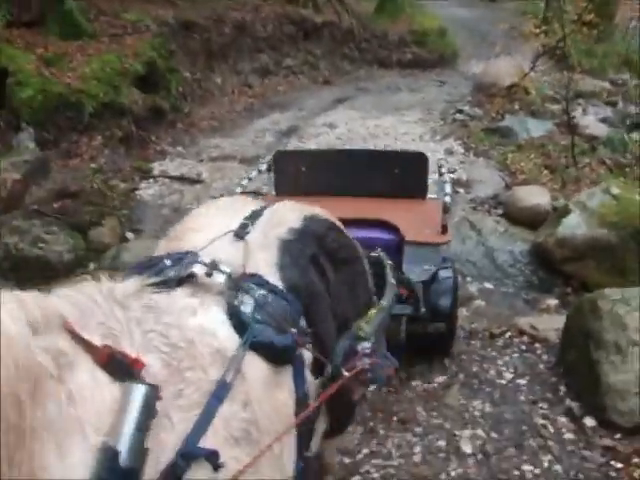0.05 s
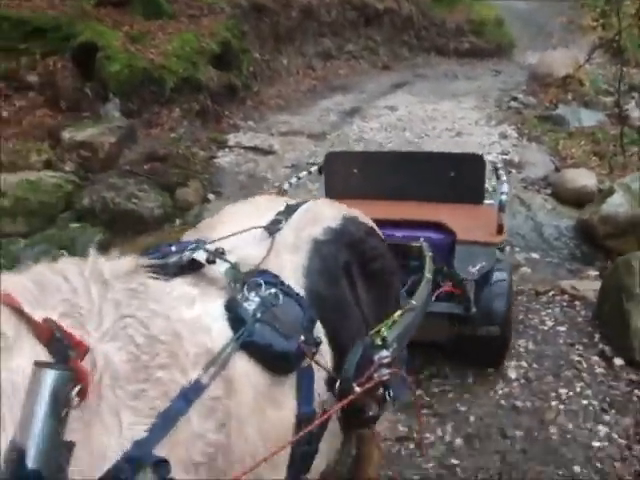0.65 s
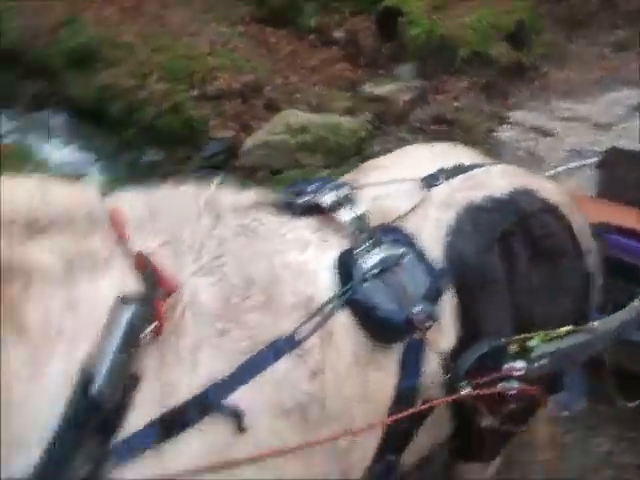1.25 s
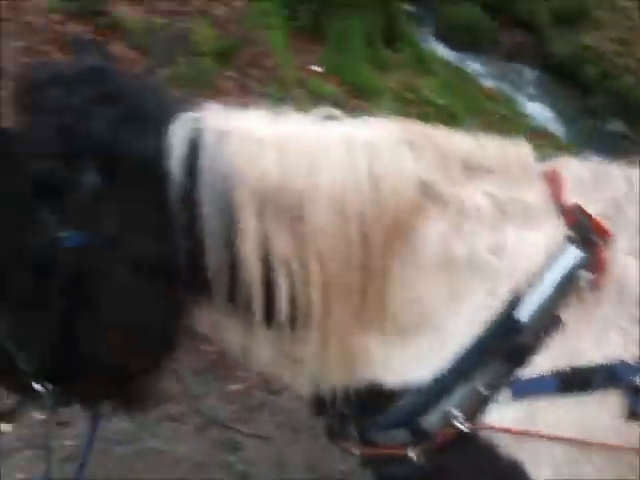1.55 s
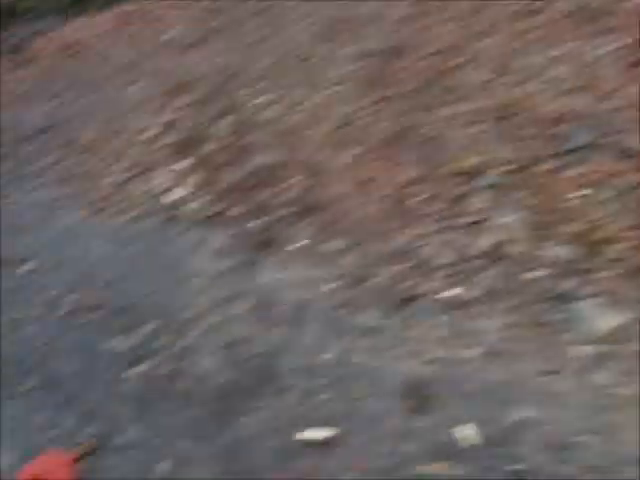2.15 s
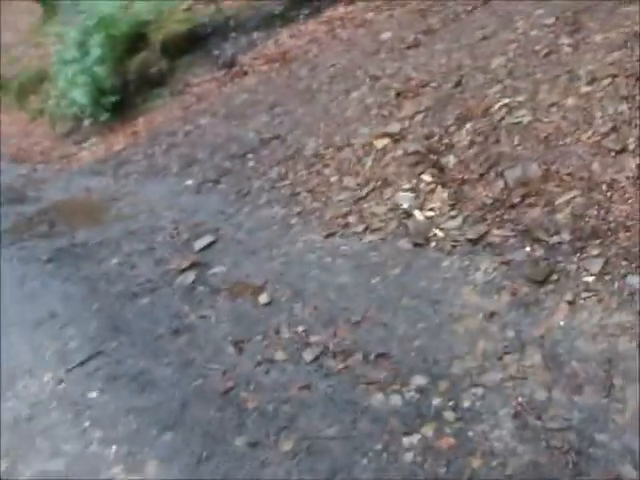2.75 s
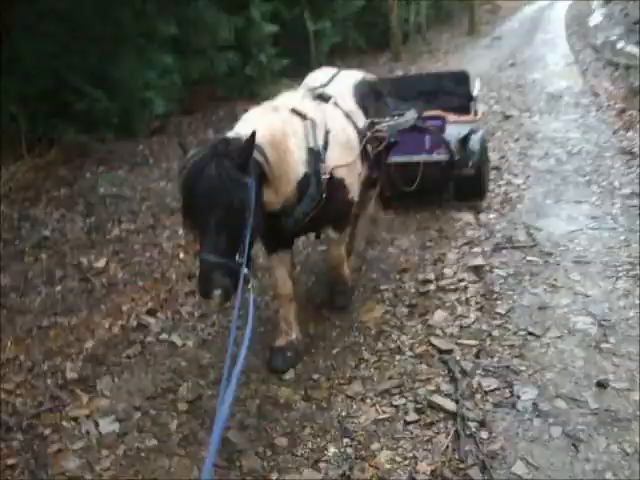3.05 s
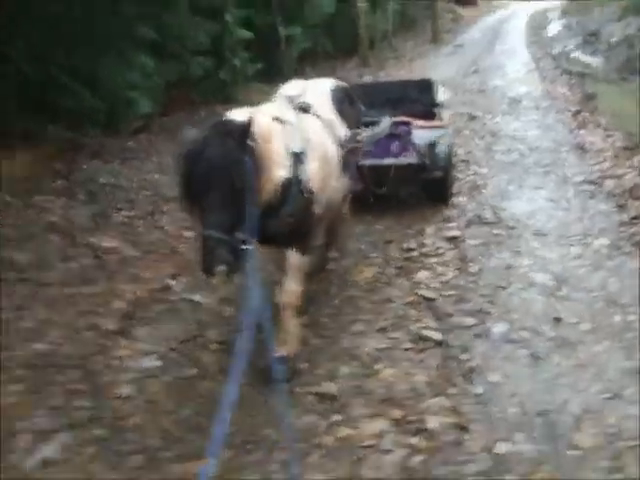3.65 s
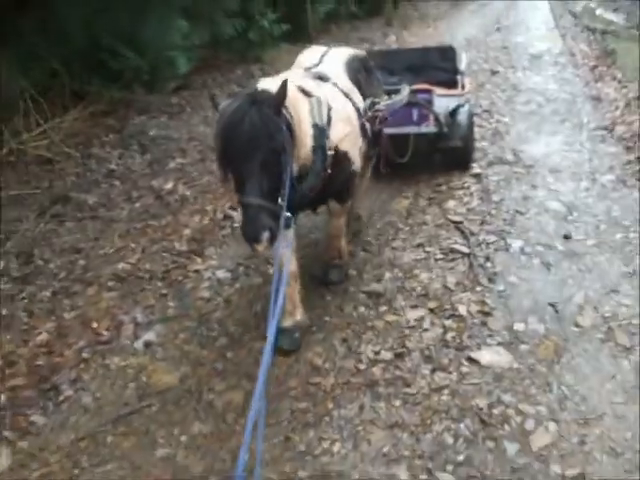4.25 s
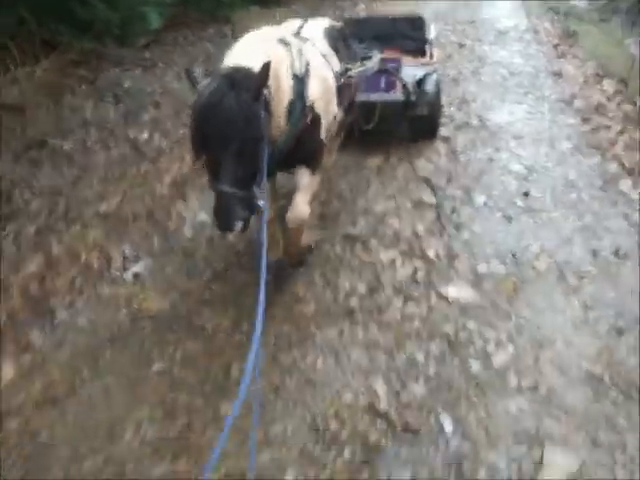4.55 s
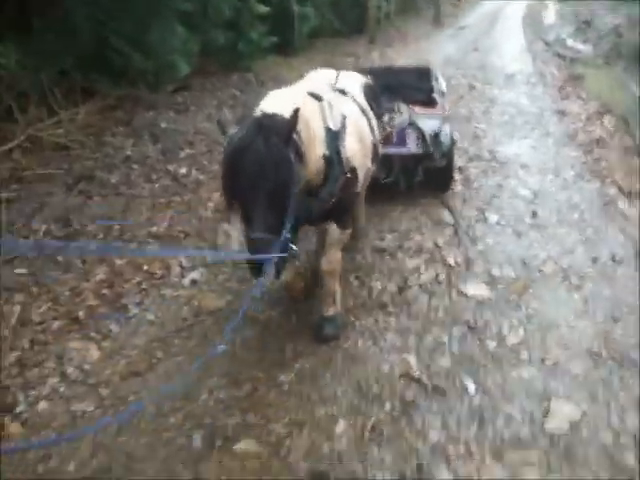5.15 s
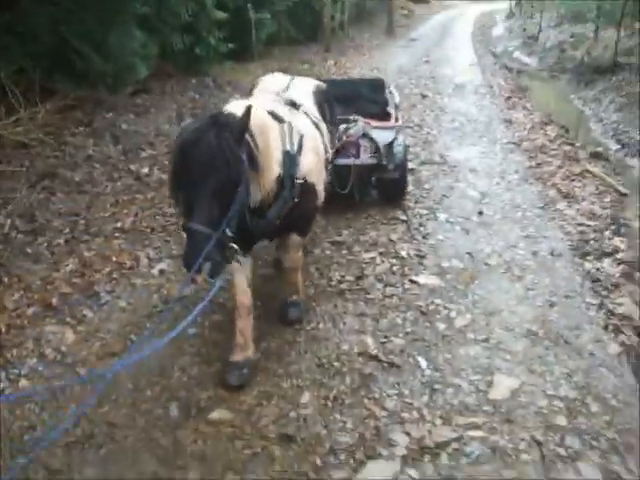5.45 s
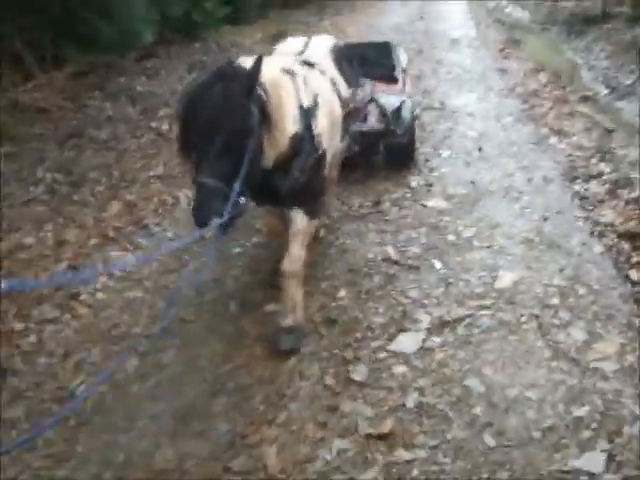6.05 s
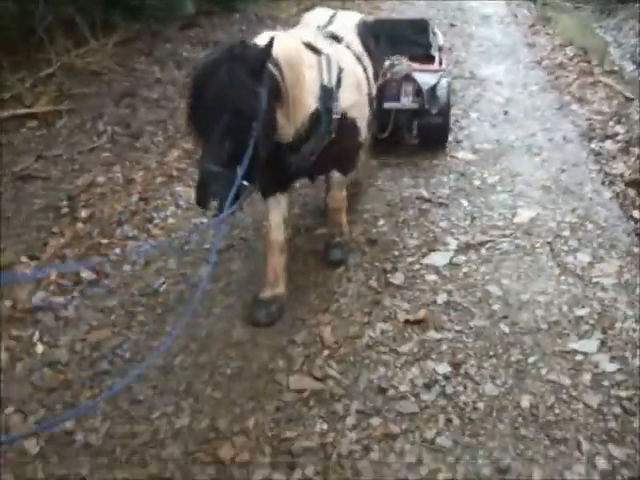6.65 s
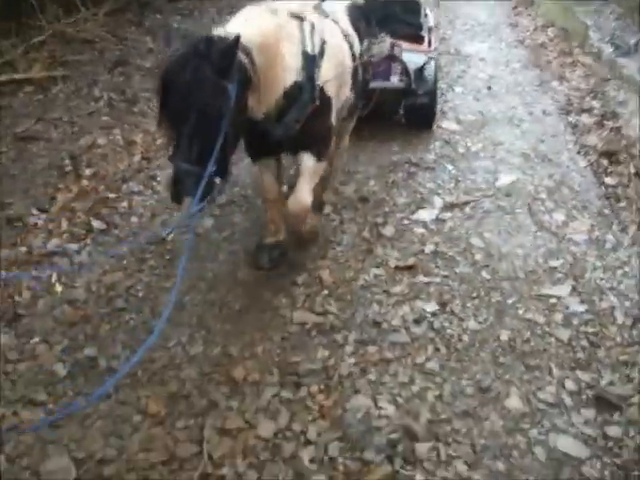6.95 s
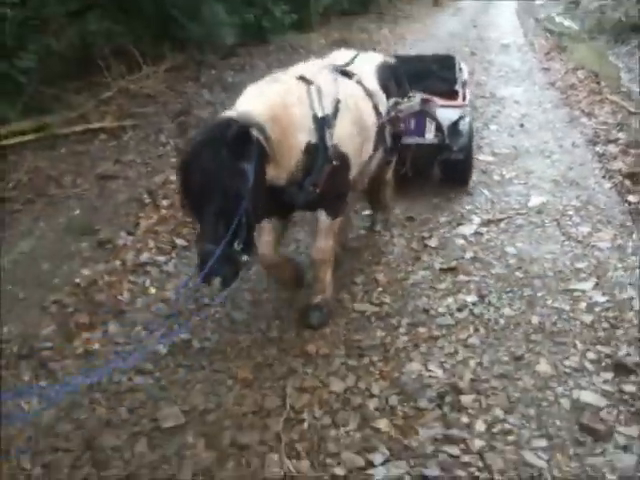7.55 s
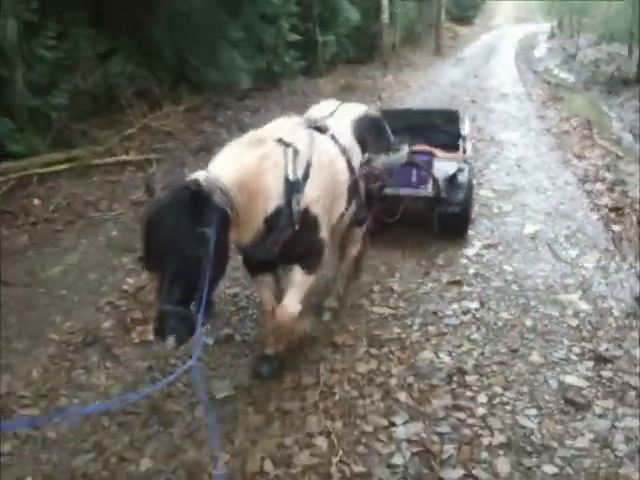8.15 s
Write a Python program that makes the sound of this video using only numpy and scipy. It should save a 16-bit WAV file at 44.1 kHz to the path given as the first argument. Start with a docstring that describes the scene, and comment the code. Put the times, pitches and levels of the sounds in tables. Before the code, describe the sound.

Heard from close by in a forest, a pony walks over wet gravel with a small cart rumbling and crunching behind it. Its steps scrape, click loose stones and land with dull thuds, and harness buckles ping now and then. For three seconds a stream churns loudly alongside, with two brief low gusts. After a tiny break the stream is far away, and the softer steps and wheels continue with a few thin squeaks.

```python
"""A pony draws a small cart out of a ford, the stream rushing close by. Hooves scuff wet grit, knock
stones together and thud; the harness clinks, the tyres crunch and the hollow cart rumbles.
Two low gusts pass, and at three seconds all sound drops out for an instant. From then on the stream
is far behind, and the cart rolls on up a wet gravel track in a forest, giving a few faint squeaks."""
import sys
import numpy as np
from scipy import signal
from scipy.io import wavfile
from scipy.ndimage import uniform_filter1d

SR = 44100
rng = np.random.default_rng(int(sys.argv[2]) if len(sys.argv) > 2 else 0)


def master_out(mix):
    """Clip the mix to full scale and print it as 16-bit PCM to the path in sys.argv[1]."""
    frames = np.transpose(np.atleast_2d(mix))
    ceiling = np.clip(frames, -1, 1)
    pcm = np.round(ceiling * 32767).astype(np.int16)
    wavfile.write(sys.argv[1], SR, pcm)


N = 370440
TIME = np.arange(N) / SR
TOP_HZ = 7950  # upper edge of the whole sound

# The pony's steps: start_s, loaded_s, crunch_db, cart_jolt_db
PONY_STEPS = [(0.0, 0.068, -28.5, -41), (0.29, 0.17, -32.5, -34.5), (0.54, 0.18, -27.5, -37),
              (0.76, 0.12, -25, -33.5), (1.11, 0.061, -29, -35), (1.44, 0.22, -44, -36),
              (2.39, 0.049, -27.5, -34), (3.15, 0.12, -34.5, -49.5), (3.46, 0.11, -37.5, -42.5),
              (3.78, 0.066, -37.5, -45), (4.031, 0.033, -40.5, -46), (4.441, 0.095, -37, -44),
              (4.76, 0.05, -44, -41), (4.97, 0.044, -35.5, -38.5), (5.19, 0.097, -32.5, -52),
              (5.52, 0.089, -32.5, -46), (5.88, 0.03, -39.5, -44), (6.13, 0.095, -34.5, -45),
              (6.44, 0.072, -40, -41), (6.72, 0.031, -37, -43), (6.909, 0.043, -25.5, -47),
              (7.19, 0.038, -37.5, -42), (7.47, 0.052, -42.5, -59), (7.75, 0.034, -36, -63),
              (7.89, 0.044, -38, -38), (8.08, 0.18, -40, -59)]
def treading(column, lag_s=0, rise_s=0.013, release_s=0.025):
    """Gain envelope of the steps: a hoof loads the ground quickly, holds, and lets go more slowly."""
    power, t = np.zeros(N), TIME[:SR]
    for step in PONY_STEPS:
        start_s, loaded_s = step[:2]
        load = np.minimum(t / rise_s, 1) * np.exp(-np.maximum(t - loaded_s, 0) / release_s)
        add(power, start_s + lag_s, (amp(step[column]) * load) ** 2)
    return np.sqrt(power)


# Tone of wet grit being crushed: frequency_hz, gain_db
GRIT_EQ = [(200, -15), (500, -14), (900, -9), (1500, -6.5), (2300, -6.5), (3000, -11.5), (3700, -7),
           (5000, -4.5), (5800, -6), (6800, 2), (7800, -7)]
# Swell and ebb of the rolling tyres: time_s, crunch_db, rumble_db
TYRE_LEVELS = [(0, -28, -32.5), (0.6, -35.5, -36.5), (1.3, -30, -43.5), (2.1, -41, -47), (3.0, -49, -45.5),
               (3.7, -41, -49.5), (4.2, -39, -47.5), (5.3, -34.5, -44.5), (6.6, -40.5, -57),
               (7.05, -36.5, -46), (7.6, -46, -51), (8.0, -36, -48), (8.4, -32, -49)]
def crunch(trim_db=1.5, clump_db=3.0, wash_db=-3, pebble_db=-7.5):
    """Grit gives way in clumps under tyres and hooves; single pebbles tick, each at its own pitch."""
    clumps = amp(clump_db * unit(uniform_filter1d(rng.standard_normal(N), size=600)))
    grit = unit(grains(N, per_s=900, spread_db=-1)) + amp(wash_db) * rng.standard_normal(N)
    grit = patchy(grit * clumps, depth_db=3.5, frames=8, bins=3)
    grit = unit(colour(grit, lambda hz: spectrum(GRIT_EQ, hz) + high_cut(hz)))
    t, pebbles = TIME[:SR // 50], np.zeros(N)
    for pitch_hz in np.geomspace(600, 7400, num=24):
        tick = np.sin(2 * np.pi * pitch_hz * t) * np.exp(-t / 0.0015)
        hits = grains(N, per_s=0.17 * np.sqrt(pitch_hz), spread_db=3.5)
        pebbles += signal.oaconvolve(hits, unit(tick))[:N]
    pressure = np.hypot(amp(curve(TYRE_LEVELS, column=1)), treading(column=2))
    return amp(trim_db) * pressure * (grit + amp(pebble_db) * unit(pebbles))


# Hooves sliding and splashing in wet grit: start_s, length_s, level_db, centre_hz
HOOF_SCUFFS = [(0.035, 0.043, -20.5, 5550), (0.128, 0.042, -22, 6380), (0.276, 0.012, -12.5, 7100),
               (0.464, 0.014, -16.5, 7200), (0.563, 0.0093, -18.5, 5800), (0.858, 0.02, -20.5, 6560),
               (1.137, 0.013, -20.5, 4270), (1.447, 0.038, -19.5, 6700), (1.485, 0.014, -14, 6290),
               (1.511, 0.083, -23.5, 6500), (1.654, 0.017, -21.5, 5280), (2.392, 0.034, -28, 5300),
               (2.427, 0.022, -18.5, 4900), (3.145, 0.012, -16.5, 6450), (3.212, 0.0078, -26.5, 6600),
               (3.864, 0.0085, -22, 5620), (3.991, 0.012, -21, 5900), (4.07, 0.028, -26.5, 6620),
               (4.22, 0.033, -30.5, 6700), (4.494, 0.012, -26.5, 4420), (4.781, 0.03, -26, 4150),
               (4.963, 0.0065, -18, 2700), (5.183, 0.02, -23.5, 4940), (5.294, 0.01, -25.5, 3260),
               (5.757, 0.027, -25, 6170), (6.011, 0.01, -22.5, 2400), (6.133, 0.016, -23.5, 6560),
               (6.913, 0.026, -19.5, 5760), (6.931, 0.029, -24.5, 5770), (7.004, 0.016, -25.5, 3580),
               (7.193, 0.02, -27.5, 2270), (7.825, 0.0096, -27.5, 1920), (8.096, 0.028, -26, 5180)]
def scuffs(octaves=1.13, wetness=0.78, rise_s=0.0044, tail_s=0.0086):
    """Each slide of a hoof is a short, dense shower of grit and water."""
    out, t = np.zeros(N), TIME[:SR // 8]
    for start_s, length_s, level_db, centre_hz in HOOF_SCUFFS:
        push = np.minimum(t / rise_s, 1) * np.exp(-np.maximum(t - 0.7 * length_s, 0) / tail_s)
        grit = unit(grains(len(t), per_s=2200, spread_db=-2.5))
        splash = wetness * rng.standard_normal(len(t))
        shower = colour((grit + splash) * push,
                        lambda hz: spectrum(GRIT_EQ, hz) + hump(hz, centre_hz, octaves)
                        + chance_modes(hz, depth_db=7.1) + high_cut(hz))
        add(out, start_s, amp(level_db) * lasting(shower, length_s))
    return out


# Stones kicked together: start_s, knock_db, knock_hz, snap_db
STONE_HITS = [(0.357, -15.5, 810, -18.5), (1.296, -20, 1010, -27), (1.612, -19, 1190, -43),
              (1.955, -22, 1510, -36), (2.142, -24.5, 1450, -24.5), (2.779, -24.5, 1620, -14.5),
              (3.096, -32, 2030, -18.5), (3.125, -40, 1500, -26), (3.363, -34.5, 1270, -26.5),
              (3.379, -32.5, 2100, -28), (3.554, -28.5, 950, -50), (3.562, -24.5, 1150, -17.5),
              (3.843, -29.5, 1120, -32), (3.908, -28.5, 2300, -32), (3.973, -23, 1750, -30),
              (4.184, -31, 1070, -31), (4.317, -27.5, 935, -25.3), (4.426, -24.5, 1850, -23.5),
              (4.482, -24, 1440, -35), (4.596, -29, 2090, -26), (4.621, -26.5, 1190, -39),
              (4.784, -30, 1550, -30), (4.811, -21, 1310, -25), (4.968, -19.5, 2300, -38),
              (5.106, -17, 1210, -45), (5.242, -33, 2220, -19.5), (5.258, -27, 1820, -18),
              (5.319, -33, 1990, -17.5), (5.423, -29, 1890, -22), (5.772, -19.5, 1940, -18),
              (6.042, -18, 1380, -21.5), (6.324, -30.5, 1510, -25), (6.35, -35, 2070, -28.5),
              (6.5, -27, 840, -29.5), (6.738, -25, 2020, -28), (7.204, -26, 1570, -28),
              (7.257, -15, 1530, -17), (7.29, -54, 1420, -22), (7.636, -41, 1500, -28.5),
              (7.83, -22.5, 1260, -43), (8.155, -47, 1500, -21.5), (8.231, -28, 2670, -22.5),
              (8.326, -24.5, 1850, -27.5), (8.366, -23.5, 2610, -28)]
def stones(snap_hz=5440):
    """A struck stone gives a low knock against the ground and a bright snap against its neighbours."""
    out, span_s = np.zeros(N), 0.005
    for start_s, knock_db, knock_hz, snap_db in STONE_HITS:
        knock = blow(knock_hz, octaves=0.75, chatter=0.88, chatter_s=0.0025, scatter=0.41, tail_s=0.022)
        snap = blow(snap_hz, octaves=0.56, chatter=0.58, chatter_s=0.0022, scatter=0.15, tail_s=0.011)
        add(out, start_s, amp(knock_db) * lasting(knock, span_s) + amp(snap_db) * lasting(snap, span_s))
    return out


# Dull blows of hooves and wheels on the ground: start_s, level_db, centre_hz
GROUND_THUDS = [(0.273, -19.5, 280), (0.384, -28, 257), (0.554, -22, 344), (0.639, -23, 273),
                (1.493, -26, 232), (1.548, -22.5, 270), (1.609, -24, 393), (1.661, -29, 282),
                (1.703, -28.5, 292), (2.396, -32, 210), (3.176, -32.5, 206), (3.397, -33.5, 218),
                (3.552, -31, 350), (3.975, -33.5, 340), (4.154, -33, 283), (4.52, -27.5, 340),
                (4.529, -30.5, 184), (4.559, -34, 307), (5.027, -30.5, 425), (5.07, -36, 367),
                (5.759, -34, 367), (5.93, -32.5, 273), (6.038, -29.5, 423), (6.213, -34, 476),
                (6.327, -32.5, 140), (6.595, -33.5, 285), (6.752, -31.5, 440), (6.928, -32.5, 274),
                (7.353, -34.5, 378), (7.836, -28, 497), (7.937, -34, 320)]
def thuds(hollow_hz=275, hollow_db=6):
    """Weight lands on packed earth: a low push with a short hollow note."""
    out = np.zeros(N)
    for start_s, level_db, centre_hz in GROUND_THUDS:
        push = blow(centre_hz, octaves=1.0, chatter=1.0, chatter_s=0.0082, scatter=0.53, tail_s=0.024)
        thud = colour(push, lambda hz: hollow_db * amp(hump(hz, hollow_hz, octaves=0.33)))
        add(out, start_s, amp(level_db) * lasting(thud, seconds=0.02))
    return out


# Tone of the hollow cart and the ground under it: frequency_hz, gain_db
CART_EQ = [(20, -23), (60, -10), (120, -0.5), (200, -0.5), (280, 1), (480, -5), (750, -7.5), (1300, -27),
           (3000, -44)]
def rumble(trim_db=2.5, jolt_db=-1, shaft_lag_s=0.012):
    """Stones jolt the hollow cart; the shafts pass on each pull of the pony a moment after the step."""
    jolts = amp(jolt_db) * unit(grains(N, per_s=160, spread_db=4.5)) + rng.standard_normal(N)
    body = unit(colour(jolts, lambda hz: spectrum(CART_EQ, hz)))
    shaking = np.hypot(amp(curve(TYRE_LEVELS, column=2)), treading(column=3, lag_s=shaft_lag_s))
    return amp(trim_db) * shaking * body


# Pings of harness rings and buckles: start_s, pitch_hz, t60_s, strike_db
HARNESS_CLINKS = [(0.287, 6960, 0.1, -11.5), (0.725, 6850, 0.11, -12), (0.9, 3430, 0.13, -24),
                  (4.488, 4000, 0.029, -18.5), (5.008, 4300, .09, -22), (6.517, 4890, 0.014, -11.5),
                  (6.825, 3960, 0.036, -20.5), (6.827, 3470, .07, -28), (7.052, 3400, .15, -33),
                  (7.07, 3580, 0.041, -17), (8.365, 2270, 0.035, -17)]
def clinks(rattle_rad=0.71):
    """Small metal fittings ring for a moment, rattling against the straps that damp them."""
    out, t = np.zeros(N), TIME[:SR // 5]
    for start_s, pitch_hz, t60_s, strike_db in HARNESS_CLINKS:
        rattle = rattle_rad * unit(uniform_filter1d(rng.standard_normal(len(t)), size=90))
        ring = np.sin(2 * np.pi * pitch_hz * t + rattle) * np.exp(-np.log(1000) * t / t60_s)
        add(out, start_s, amp(strike_db) * ring)
    return out


# Faint, thin squeaks of the cart: start_s, length_s, from_hz, to_hz, level_db
CART_SQUEAKS = [(3.273, 0.098, 1173, 1063, -42.5), (3.513, 0.04, 2300, 2060, -29),
                (4.759, 0.48, 1683, 1547, -42), (5.577, .38, 2545, 2326, -44),
                (5.706, 0.07, 2620, 2500, -44)]
def squeaks(waver_hz=120):
    """Something rubs on the cart with a rough, unsteady, falling pitch."""
    out = np.zeros(N)
    for start_s, length_s, from_hz, to_hz, level_db in CART_SQUEAKS:
        n = int(length_s * SR)
        waver, grip = unit(uniform_filter1d(rng.standard_normal((2, n)), size=110))
        cycles = np.cumsum(np.linspace(from_hz, to_hz, n) + waver_hz * waver) / SR
        rub = np.sin(2 * np.pi * cycles) * (1 + 0.5 * grip)
        add(out, start_s, amp(level_db) * unit(rub * signal.windows.tukey(n, 0.5)))
    return out


# Tone of rushing water: frequency_hz, gain_db
WATER_EQ = [(25, -18), (86, -10), (160, -8), (270, -3), (450, -7.5), (900, -5), (1630, -4.5), (2400, -5),
            (3400, -11.5), (4100, -6.5), (5600, -5), (7000, -3.5), (7900, -10)]
# The stream, first close, then abruptly distant: time_s, level_db
STREAM_FADE = [(0, -24.5), (1, -26.5), (2, -27), (2.6, -29.5), (3.05, -30.5), (3.07, -36), (3.5, -42.5),
               (8.4, -43)]
def stream(spray_db=-8, bubble_db=-15):
    """Churning water: a patchy rush, a spray of droplets and small ringing bubbles."""
    rush = patchy(rng.standard_normal(N), depth_db=2, frames=10, bins=2)
    spray = amp(spray_db) * unit(grains(N, per_s=1500, spread_db=2.0))
    water = unit(colour(unit(rush) + spray, lambda hz: spectrum(WATER_EQ, hz) + high_cut(hz)))
    t, bubbles = TIME[:SR // 25], np.zeros(N)
    for pitch_hz in np.geomspace(450, 5500, num=24):
        # a bubble rises in pitch as it nears the surface
        ring = np.sin(2 * np.pi * pitch_hz * t * (1 + 4 * t)) * np.exp(-t * pitch_hz / 7)
        bubbles += signal.oaconvolve(grains(N, per_s=12, spread_db=7.5), unit(ring))[:N]
    return amp(curve(STREAM_FADE, column=1)) * (water + amp(bubble_db) * unit(bubbles))


# Puffs of wind: start_s, length_s, level_db
WIND_PUFFS = [(1.877, 0.13, -34.5), (2.86, 0.37, -45)]
def gusts(band_hz=(20, 80)):
    """Moving air swells into brief, low buffets."""
    out = np.zeros(N)
    air = signal.sosfilt(signal.butter(2, band_hz, "band", fs=SR, output="sos"), rng.standard_normal(N))
    for start_s, length_s, level_db in WIND_PUFFS:
        puff = air[int(start_s * SR):][:int(length_s * SR)]
        add(out, start_s, amp(level_db) * unit(puff * np.hanning(len(puff))))
    return out


def blow(centre_hz, octaves, chatter, chatter_s, scatter, tail_s):
    """One contact, its quick chatter and a tail of scatter, through the uneven ring of what is struck."""
    t = TIME[:SR // 8]
    force = signal.unit_impulse(len(t))
    for share, decay_s in ((chatter, chatter_s), (scatter, tail_s)):
        force += share * lasting(rng.standard_normal(len(t)) * np.exp(-t / decay_s), 1 / SR)
    return colour(force, lambda hz: 2 * hump(hz, centre_hz, octaves)
                  + chance_modes(hz, depth_db=6.5) + high_cut(hz))


def chance_modes(hz, depth_db):
    """Every stone has its own chance peaks and dips, in dB."""
    heights = rng.uniform(-1, 1, size=26)
    return depth_db * np.interp(np.sqrt(hz), np.linspace(0, np.sqrt(TOP_HZ), len(heights)), heights)


def grains(n, per_s, spread_db):
    """Random tiny impacts; a positive spread makes a few stand out, a negative one sinks a few."""
    size = amp(spread_db * np.minimum(rng.exponential(1, n), 4))
    return size * rng.choice([-1, 1], n) * (rng.random(n) < per_s / SR)


def patchy(x, depth_db, frames, bins):
    """Shifts the colour of a sound from moment to moment in small random patches."""
    cells = signal.stft(x, SR, nperseg=256)[2]
    patches = uniform_filter1d(rng.standard_normal(cells.shape), bins, axis=0)
    patches = uniform_filter1d(patches, frames, axis=1)
    return signal.istft(cells * amp(depth_db * unit(patches)), SR, nperseg=256)[1][:len(x)]


def colour(x, gain_db, size=2048):
    """Minimum-phase EQ whose gain in dB is a function of frequency."""
    hz = abs(np.fft.fftfreq(size, 1 / SR))
    log_gain = np.log(amp(np.maximum(gain_db(hz), -90)))
    taps = np.fft.ifft(np.exp(np.conj(signal.hilbert(log_gain)))).real
    return signal.fftconvolve(x, taps[:size // 2])[:len(x)]


def spectrum(eq, hz):
    """Reads an EQ table in dB along a log-frequency axis."""
    frequency_hz, gain_db = np.transpose(eq)
    return np.interp(np.log(hz + 1), np.log(frequency_hz), gain_db)


def hump(hz, centre_hz, octaves):
    """A broad resonance in dB, 3 dB down at that many octaves from its centre."""
    return -10 * np.log10(1 + (np.log2((hz + 1) / centre_hz) / octaves) ** 4)


def high_cut(hz):
    """A steep fall in dB above TOP_HZ."""
    return -np.clip((hz - TOP_HZ) / 25, 0, 60)


def curve(rows, column):
    """One column of a time table at every sample."""
    rows = np.array(rows)
    return np.interp(TIME, rows[:, 0], rows[:, column])


def amp(db):
    """Decibels to gain."""
    return 10 ** (np.asarray(db) / 20)


def unit(x):
    """Scales to rms 1."""
    return x / np.sqrt(np.mean(x ** 2) + 1e-20)


def lasting(x, seconds):
    """Scales a burst to the energy that rms 1 has over that time."""
    return x * np.sqrt(seconds * SR / (np.sum(x ** 2) + 1e-20))


def add(mix, start_s, sound):
    """Mixes a sound in at its start time."""
    part = mix[max(round(start_s * SR), 0):][:len(sound)]
    part += sound[:len(part)]


def scene():
    """Water, pony, cart and wind in the open air, the same in both channels."""
    mono = stream() + crunch() + rumble() + scuffs() + stones() + thuds() + clinks() + squeaks() + gusts()
    return np.array([mono, mono])


# An instant of silence: start_s, end_s
DROPOUT = (3.048, 3.065)
def record(dry):
    """The sound drops out for an instant, peaks are clipped and the top treble is cut away."""
    gate = (TIME < DROPOUT[0]) | (TIME > DROPOUT[1])
    clipped = np.clip(dry * gate, -1, 1)
    low_pass = signal.firwin(301, TOP_HZ, window=("kaiser", 7), fs=SR)
    return signal.oaconvolve(clipped, low_pass[None], "same", axes=1)


dry = scene()
out = record(dry)
master_out(out)
```